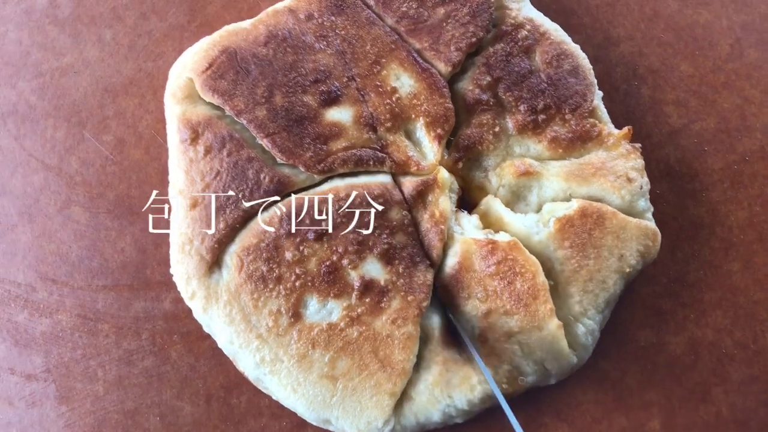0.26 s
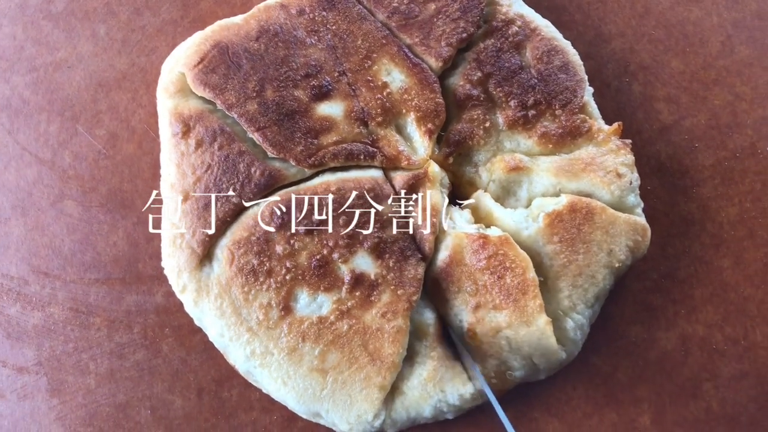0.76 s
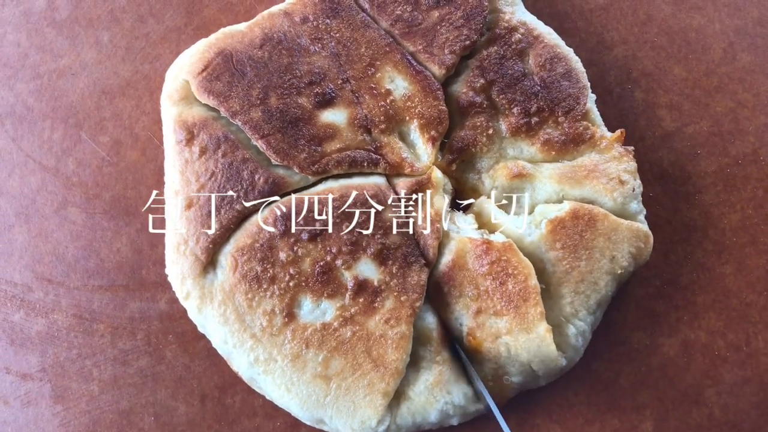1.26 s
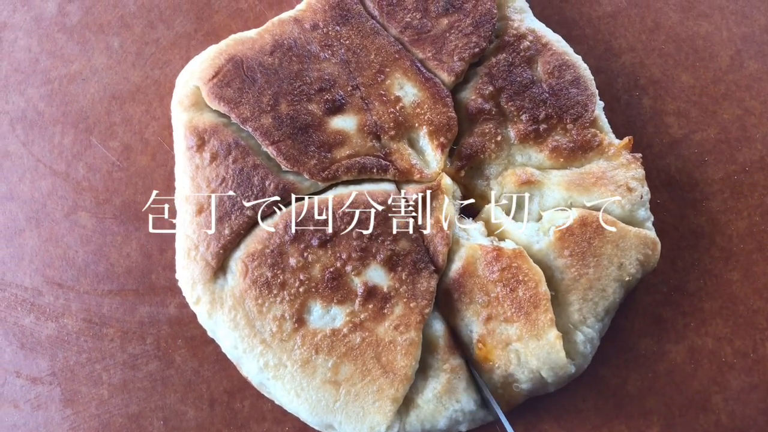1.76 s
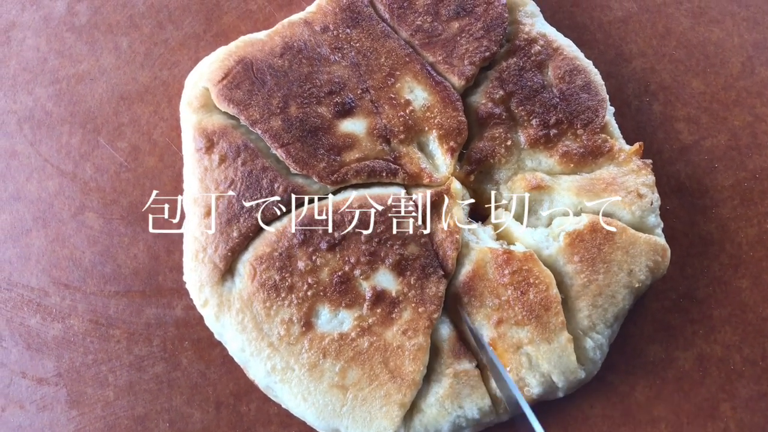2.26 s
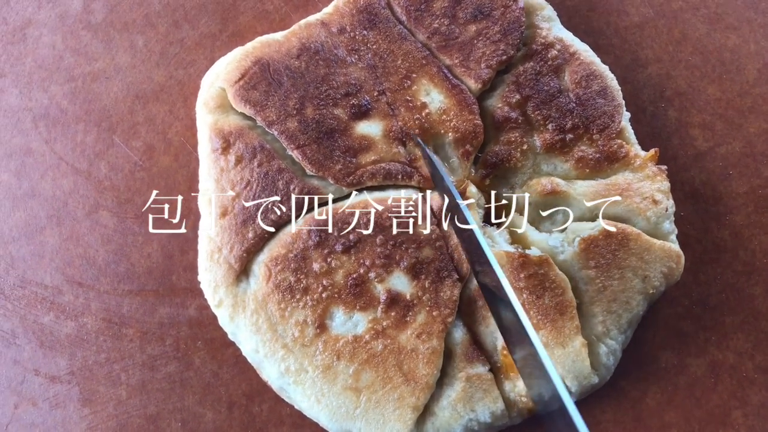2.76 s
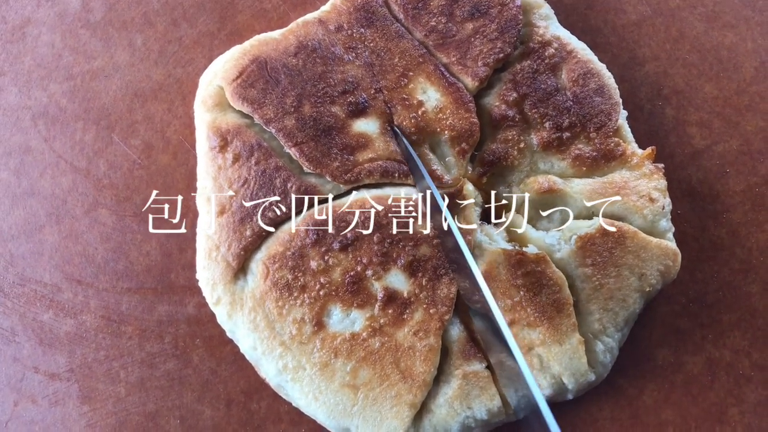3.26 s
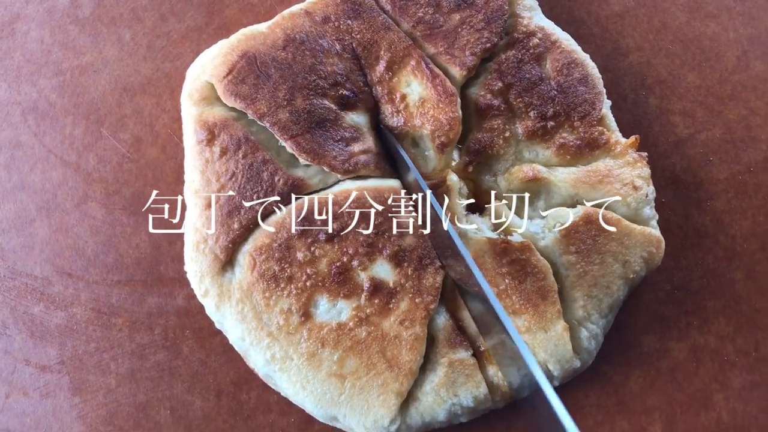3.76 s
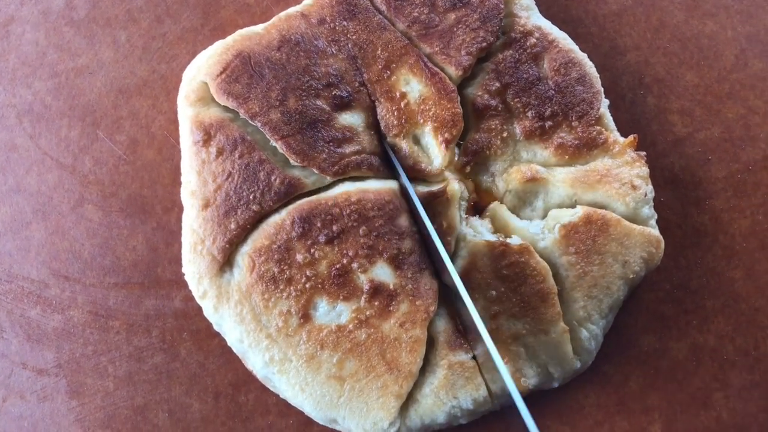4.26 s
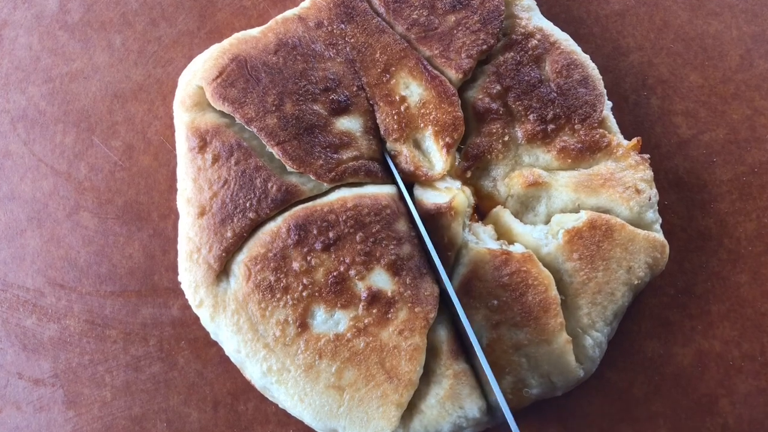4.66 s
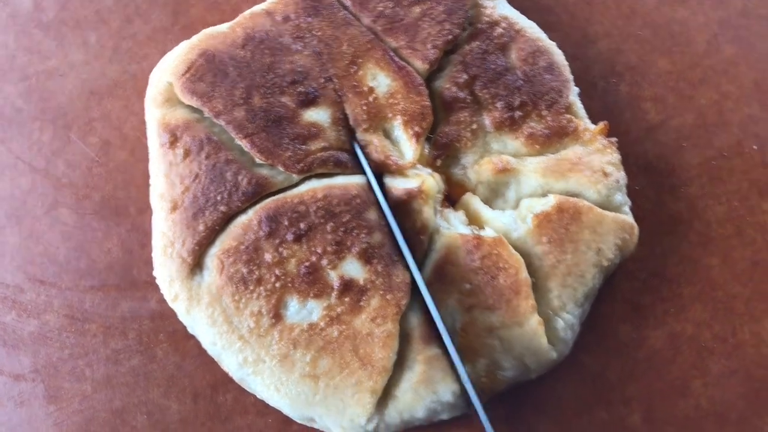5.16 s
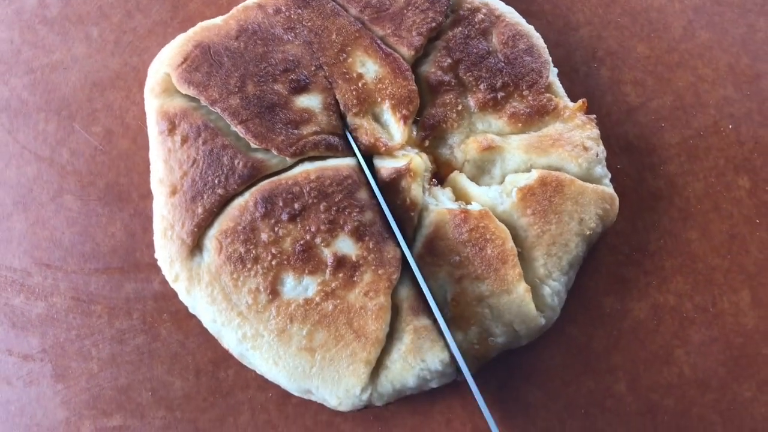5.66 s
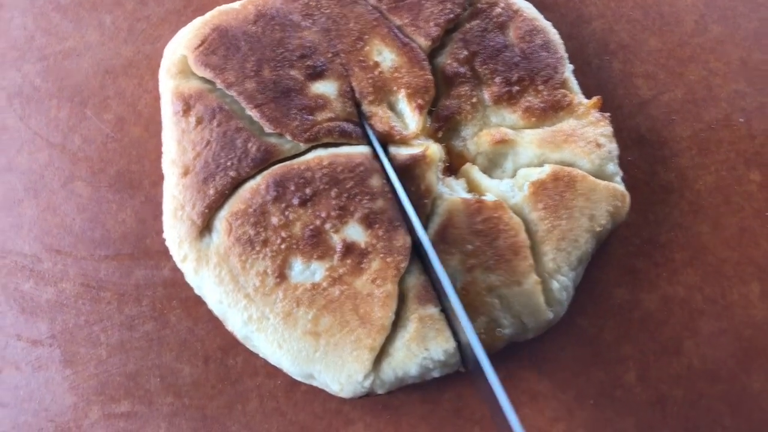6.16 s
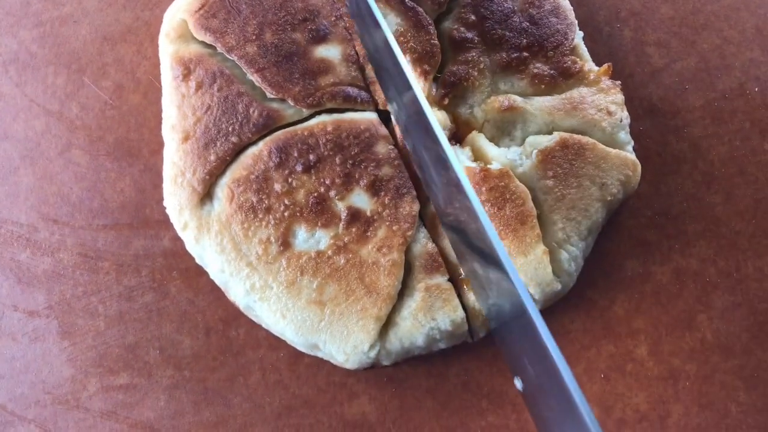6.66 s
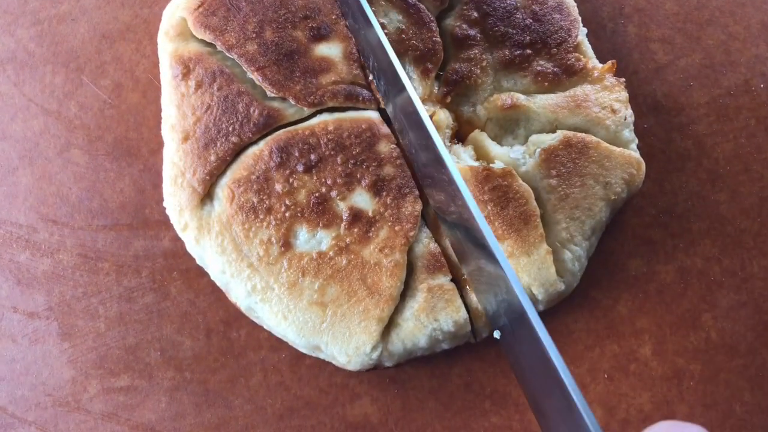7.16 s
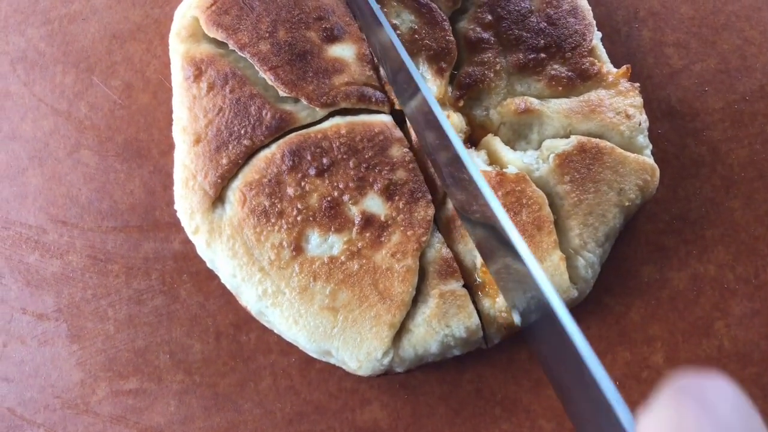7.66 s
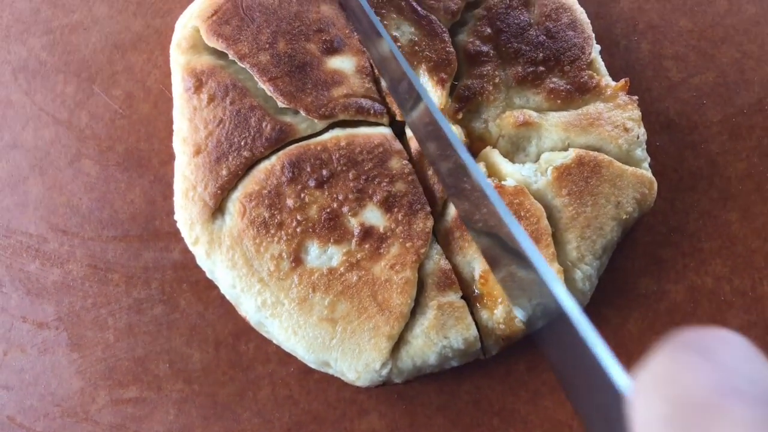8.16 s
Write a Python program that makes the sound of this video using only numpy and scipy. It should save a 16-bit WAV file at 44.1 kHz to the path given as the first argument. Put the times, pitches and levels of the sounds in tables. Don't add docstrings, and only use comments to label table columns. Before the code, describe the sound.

Quick dry rasps of a knife edge on crusty bread with tiny flake ticks, fading to faint shifts of the blade. Then brittle crunching in bursts, a cushioned thud, more crunching and a sharp woody knock as the edge hits the board. Crackles die away, and to-and-fro sawing returns. Mono, close phone microphone, small quiet kitchen with faint low room hum.

```python
import sys
import numpy as np
from scipy import signal
from scipy.fft import rfft, irfft, next_fast_len
from scipy.io import wavfile
from scipy.ndimage import uniform_filter1d

SR = 44100
rng = np.random.default_rng(int(sys.argv[2]) if len(sys.argv) > 2 else 0)


def boost_factor(decibels):
    exponent = np.asarray(decibels, float) / 20
    return 10 ** exponent


def pcm_store(signal):
    levels = np.round(np.clip(np.atleast_2d(signal), -1, 1) * 32767)
    wavfile.write(sys.argv[1], SR, levels.astype(np.int16).T)


N = 371763


def evened(x):
    return x / np.sqrt(np.mean(x ** 2) + 1e-20)


def read(points, hz):
    f, value = np.transpose(points)
    return np.interp(np.log(hz + 1), np.log(f + 1), value)


def coloured(x, points):
    size = next_fast_len(len(x))
    gain = boost_factor(read(points, np.fft.rfftfreq(size, 1 / SR)))
    return evened(irfft(rfft(x, size) * gain, size)[:len(x)])


def add(mix, s, sound):
    sound = sound[max(-round(s * SR), 0):]
    part = mix[max(round(s * SR), 0):][:len(sound)]
    part += sound[:len(part)]


def resonate(x, hz, width):
    return signal.lfilter(*signal.iirpeak(min(hz, SR / 2.2), hz / max(width, 5), SR), x)


def drift(points):
    once = uniform_filter1d(rng.standard_normal(N), int(points))
    return evened(uniform_filter1d(once, int(points)))


# frequency in Hz, level in dB per Hz.
AIR_SPECTRUM = [(20, -23), (69, -5), (342, -7), (400, -12.5), (1000, -19.5), (2370, -32.5), (12800, -30),
                (15200, -30.5)]
# frequency in Hz, width in Hz, level in dB.
RUMBLE_BANDS = [(62.4, 18, -76.5), (250.3, 18, -73)]
AIR_DB = -69


def air():
    x = coloured(rng.standard_normal(N), [(9, -56)] + AIR_SPECTRUM)
    bass = signal.sosfilt(signal.butter(2, 600, fs=SR, output="sos"), x)
    lumps = (boost_factor(0.56 * drift(3000)) - 1) * bass
    hum = sum(boost_factor(db) * evened(resonate(rng.standard_normal(N), hz, w)) for hz, w, db in RUMBLE_BANDS)
    return boost_factor(AIR_DB + 0.5) * (x + lumps) + hum


def grit(per_s, spread_db):
    size = boost_factor(spread_db * np.minimum(rng.exponential(1, N), 4.2))
    return size * rng.standard_normal(N) * (rng.random(N) < per_s / SR)


# frequency in Hz, width in Hz, level in dB.
BLADE_MODES = [(2210, 120, -3), (3080, 90, -3), (3700, 100, -1), (6100, 130, -1), (7730, 150, -4),
               (12000, 220, 0), (13200, 200, -2), (14450, 130, -2)]
# frequency in Hz, level in dB per Hz.
CRUMB_SPECTRUM = [(300, -0.5), (600, -5), (1000, 0.5), (1700, -5.5), (2500, -5.5), (4000, -21.5)]


def rubbing(rub, crumb, ringing, per_s, spread_db, hollow, colour):
    def ring_blade(x):
        return sum(boost_factor(db) * resonate(x, hz, w) for hz, w, db in BLADE_MODES)

    breaks = evened(grit(per_s, spread_db) * boost_factor(1.05 * drift(150)))
    blade = ring_blade(ringing * breaks) / np.std(ring_blade(breaks))
    body = crumb * boost_factor(0.8 * drift(300)) * coloured(grit(per_s / 3, spread_db), CRUMB_SPECTRUM)
    cavity = 2 * resonate(body, 1760, 500)
    body = (1 - hollow) * body + hollow * cavity
    return rub * coloured(breaks, colour) + blade + body


# frequency in Hz, level in dB per Hz.
GRIT_SPECTRUM = [(880, -41.5), (1500, -2), (2300, -6.5), (3200, -2), (5000, -2.5), (11300, -7),
                 (14900, -6.5), (16000, -12)]
# time in seconds, level in dB.
SETTLING = [
    (0, -75),
    (2.3, -78),
    (6.05, -74.5),
    (6.4, -79),
    (7.199, -76.5),
    (8.43, -77),
]
# start in seconds, length in seconds, rub level in dB, crumb against the rub in dB.
RIM_STROKES = [(-0.03, 0.13, -55.5, -3), (0.128, 0.12, -61, -9.5), (0.294, 0.091, -58.5, -4),
               (0.409, 0.14, -63.5, -8), (0.584, 0.093, -59, 0), (0.711, 0.13, -65.5, -2),
               (0.881, 0.12, -64, 1.1), (1.028, 0.1, -69, 2.5), (1.203, 0.076, -66.5, -0.5),
               (1.341, 0.057, -69.5, 3), (1.486, 0.058, -70.2, 2), (1.604, 0.086, -74.5, 0.5),
               (1.765, 0.04, -70.5, 5.5), (1.881, 0.022, -75, 8.5), (1.994, 0.063, -73, -6),
               (2.122, 0.013, -67.5, -4), (2.192, 0.025, -70.5, -4)]
SHIFTS = [(2.713, 0.048, -65.5, 1), (2.783, 0.054, -68, -2), (2.865, 0.028, -78, 0),
          (2.955, 0.0088, -71.5, -12), (3.11, 0.0033, -68, 4), (3.209, 0.053, -77.5, 7),
          (3.351, 0.054, -77, 7.5), (3.41, 0.16, -78, -4), (6.092, 0.016, -76.5, 2.5),
          (6.241, 0.064, -76, 7.5), (6.617, 0.025, -83, 6), (6.832, 0.015, -74, 3), (7.075, 0.011, -71, -2),
          (7.18, 0.036, -72.5, -1)]
CUT_STROKES = [
    (7.286, 0.11, -71.5, -1),
    (7.348, 0.12, -66.5, -1),
    (7.513, 0.1, -60, -6.5),
    (7.668, 0.072, -62, -1),
    (7.774, 0.11, -63, -2),
    (7.92, 0.073, -63, 3),
    (8.035, 0.092, -66, 1),
    (8.159, 0.085, -62.5, 4),
    (8.279, 0.1, -66, 2),
    (8.424, 0.03, -68.5, 7.5),
]
# ringing in dB at a -65.5 dB rub, share of the rub level
# it follows, fade within a stroke in dB.
RIM_RING = (-96, .1, -0.49)
SHIFT_RING = (-67, 2, -4.5)
CUT_RING = (-73.5, 0.47, -1.3)


def sawing():
    rub, crumb, ringing = np.zeros((3, N))
    passes = ((RIM_STROKES, RIM_RING), (SHIFTS, SHIFT_RING), (CUT_STROKES, CUT_RING))
    for strokes, (ring_db, follows, fade_db) in passes:
        for s, length, rub_db, crumb_db in strokes:
            u = np.linspace(0, 1, round((length + 0.02) * SR))
            fade = boost_factor(fade_db * np.interp(u, [0.3, 0.7], [-0.5, 0.5]))
            speed = fade * np.clip(np.sin(np.pi * u) * 1.47, 0, 1) ** 1.47
            add(rub, s - 0.012, speed * boost_factor(rub_db))
            add(crumb, s - 0.012, speed * boost_factor(rub_db + crumb_db))
            add(ringing, s - 0.012, speed * boost_factor(ring_db + follows * (rub_db + 65.5)))
    settling = boost_factor(np.interp(np.arange(N) / SR, *np.transpose(SETTLING)))
    return rubbing(np.hypot(rub, settling), crumb, ringing, 14000, 1.9, 0, GRIT_SPECTRUM)


def bending(spread, length):
    t = np.sqrt(spread / 5000) + np.arange(round(length * SR)) / SR
    return np.sin(2 * np.pi * spread / t) * signal.windows.tukey(len(t), 0.6)


# frequency in Hz, width in Hz, level in dB.
LOAF_MODES = [(1500, 730, 9.5), (2477, 2160, -4), (3500, 1300, -4.5)]


def snap(peak_db, hz, hollow_db, spray_db, noise):
    t = np.arange(len(noise)) / SR

    def colour(x):
        return resonate(x, hz, 0.262 * hz) + 0.27 * resonate(x, 11000, 9800)

    kick = signal.unit_impulse(len(t), 18) + 0.5 * noise * boost_factor(-60 * abs(t - 18 / SR) / 0.003)
    click = colour(kick)
    shower = noise[::-1] * boost_factor(spray_db + 0.5 - 60 * t / 0.022) * (1 - np.exp(-t / 0.00129))
    spray = colour(shower)
    spray = spray * np.linalg.norm(shower) / np.linalg.norm(spray)
    push = kick + 0.29 * noise * boost_factor(-60 * t / 0.029) * (1 - np.exp(-t / 0.001))
    hollow = sum(boost_factor(db) * resonate(push, f, w) for f, w, db in LOAF_MODES)
    sweep = np.pad(bending(0.00597, 0.00368), (0, len(t)))[:len(t)]
    hollow = hollow / abs(hollow).max() + 0.27 * sweep
    hollow = boost_factor(hollow_db) * hollow / abs(hollow).max()
    return boost_factor(peak_db) * (click / abs(click).max() + spray + hollow)


# time in seconds, peak in dB, centre in Hz.
FLAKES = [(0.0775, -38, 3800), (0.284, -42.5, 5770), (0.8674, -49, 14810), (0.9161, -51, 13090),
          (0.989, -42, 14470), (1.2516, -41, 14300), (1.4181, -45, 11100), (1.4453, -44, 6760),
          (1.4998, -48.5, 6890), (1.5223, -47, 7490), (1.5297, -48.5, 7320), (1.5796, -47.5, 12830),
          (1.7522, -47.5, 9050), (1.8024, -44, 7200), (1.8565, -44.5, 14300), (1.8654, -49, 6550),
          (2.004, -44, 5840), (2.1072, -40.5, 5640), (2.1211, -38.5, 3920), (2.126, -43, 14990),
          (2.7774, -50, 7700), (3.1062, -47, 13180), (3.4207, -51, 14500), (7.0736, -47.5, 7920),
          (7.1745, -52.5, 9000), (6.835, -58.5, 6000)]
# time in seconds, peak in dB, centre in Hz, hollow of the loaf against the peak in dB.
BITE_SNAPS = [(3.6538, -33.5, 11900, -14), (3.7137, -35, 2700, -11), (3.719, -28.5, 3060, -13.5),
              (3.7318, -29.5, 2740, -21), (3.7426, -35, 2700, -10), (3.766, -41, 2700, -12),
              (3.7938, -45, 3450, -7), (3.7991, -33, 2590, -14), (3.8215, -36, 7320, -24),
              (3.835, -33, 5800, -23), (3.856, -38, 2620, -5), (3.8593, -36.5, 14130, -15),
              (3.871, -43, 2620, 4), (3.9139, -24, 11600, -12), (3.9259, -43, 8790, -14),
              (3.9547, -52, 5600, -13), (3.6818, -50, 5250, -12), (4.016, -53.5, 5540, 1),
              (3.7257, -35.5, 3000, -2.5), (3.762, -44, 2700, 1.5), (4.2526, -43.5, 5770, -16),
              (4.291, -51, 3530, -3), (4.2962, -44, 7750, -2), (4.3135, -54.5, 2700, 10),
              (4.335, -40, 6900, -2.5), (4.3562, -33, 7400, -6), (4.3865, -38, 2730, -33)]
SINK_SNAPS = [(4.5097, -42.5, 4840, -29), (4.5265, -49, 5000, -20), (4.539, -44.5, 12750, -13),
              (4.5637, -47, 3220, -25), (4.5676, -40.5, 3340, -18), (4.6053, -45.5, 5100, -5),
              (4.6432, -58.5, 3010, 10), (4.697, -39.5, 14810, -10.5), (4.732, -42, 2680, 3),
              (4.76, -42.5, 5170, -1.5), (4.777, -49, 7920, -18), (4.808, -44.5, 12580, -20),
              (4.8601, -42, 7700, -4), (4.8934, -50, 7060, -24), (4.9173, -41.5, 6800, -8),
              (4.9612, -43, 13870, -12), (4.9708, -38, 2900, 6), (4.7161, -50, 6630, -23),
              (4.654, -48, 5000, -7)]
ROCK_SNAPS = [(5.1135, -40, 4000, -24), (5.1198, -32.5, 3840, -10), (5.1466, -38, 4500, -3),
              (5.1617, -31.5, 2670, -13), (5.1754, -29, 4800, -4.5), (5.1802, -34.5, 4870, -15),
              (5.2182, -30.5, 8080, -5.5), (5.2357, -37, 4040, -8.5), (5.2121, -41.5, 5250, -17.5),
              (5.2456, -38.5, 8900, -10), (5.2635, -37, 8000, -9), (5.2864, -47.5, 7900, -24),
              (5.3297, -22, 4200, -15), (5.338, -36, 5200, -8), (5.388, -34, 2700, -16),
              (5.4103, -38, 3600, 0.5), (5.4781, -27, 2740, 12), (5.532, -29, 4260, -5),
              (5.6027, -36.5, 5300, -12), (5.615, -37.5, 4570, -16), (5.6327, -42.5, 2700, -2),
              (5.7076, -40.5, 3840, -16), (5.7176, -40.5, 6930, -7.5), (5.8636, -44, 4000, -8),
              (5.9086, -44, 4850, -8), (5.917, -40.5, 8100, -13), (5.9396, -31, 4760, -7.5),
              (5.9449, -42, 14900, 2.5), (5.9529, -35, 3850, -4)]
FLAKE_HOLLOW_DB, FLAKE_SPRAY_DB, SNAP_SPRAY_DB = -22, -24, -19


def cracking():
    rows = [(s, db, hz, FLAKE_HOLLOW_DB, FLAKE_SPRAY_DB) for s, db, hz in FLAKES]
    rows += [(*row, SNAP_SPRAY_DB) for row in BITE_SNAPS + SINK_SNAPS + ROCK_SNAPS]
    out = np.zeros(N)
    for (s, *row), noise in zip(rows, rng.standard_normal((len(rows), 2000))):
        add(out, s - 14 / SR, snap(*row, noise))
    return out


def thud(peak_db, hz, t60):
    t = np.arange(SR // 3) / SR
    bent = t + 0.00048 * (1 - np.exp(-t / 0.0031))
    return boost_factor(peak_db - 60 * t / t60) * np.sin(2 * np.pi * hz * bent) * (1 - np.exp(-4.0 * hz * t))


# time in seconds, peak in dB, frequency in Hz, decay t60 in seconds.
DULL_BLOWS = [(1.218, -46, 865, 0.012), (1.2365, -41, 790, 0.014), (1.241, -50, 455, 0.022),
              (1.252, -39, 800, 0.0082), (1.263, -48, 171, 0.045), (1.241, -50, 1500, 0.013),
              (1.24, -51.5, 287, 0.075), (3.735, -48.5, 143, 0.067), (3.869, -45, 121, 0.031),
              (4.53, -52.5, 50, 0.23), (4.9771, -28, 186, 0.046), (4.977, -32, 274, 0.11),
              (4.9755, -37, 650, 0.024), (4.982, -32.5, 135, 0.063), (4.98, -34.5, 71.5, 0.13),
              (5.4815, -13, 493, 0.011), (5.483, -27.5, 268.4, 0.15), (5.485, -23.5, 134, 0.033),
              (5.485, -44, 65.2, 0.17), (5.952, -49.5, 151.2, 0.078), (7.073, -52, 792, 0.02)]


def thuds():
    out = np.zeros(N)
    for s, *row in DULL_BLOWS:
        add(out, s, thud(*row))
    return out


# start in seconds, length in seconds, crackle in dB
# at the start, crackle in dB at the end, crumb against the crackle in dB.
YIELDS = [(3.621, 0.16, -71, -66, 3), (3.706, 0.26, -50, -69.5, -1), (3.93, .13, -66, -71.5, -0.5),
          (4.148, 0.053, -71, -74, 3), (4.272, 0.035, -74, -71, 9), (4.337, 0.07, -61, -65, -18),
          (4.487, 0.18, -66, -66, -7), (4.681, 0.31, -64.5, -58.5, 0.5), (3.793, 0.0077, -42, -50.5, 7.5),
          (4.05, 0.038, -79, -62, -0.5), (5.0, 0.14, -75, -71.5, 9.5), (5.107, 0.32, -52.5, -71.5, 5),
          (5.33, 0.11, -50.5, -70.5, -1), (5.397, 0.069, -51, -47, 3.5), (5.484, 0.08, -52, -42.5, 2),
          (5.574, 0.12, -46.5, -67, 1.5), (5.702, 0.07, -53.5, -66, -1.5), (5.852, 0.069, -54.5, -68, 0),
          (5.911, 0.037, -71, -55, 2), (5.962, 0.066, -54, -78, 4)]
# frequency in Hz, level in dB per Hz.
CRACKLE_SPECTRUM = [(880, -31.5), (1600, -5), (4500, 0), (6000, -3), (14900, -9.5), (16000, -15)]
PUSH_RISE_S, PUSH_FALL_S = 0.005, 0.018


def crunch():
    rub, crumb = np.zeros((2, N))
    for s, length, start_db, end_db, crumb_db in YIELDS:
        t = np.arange(0, length + PUSH_FALL_S, 1 / SR)
        edges = np.clip(np.minimum(t / PUSH_RISE_S, (t[-1] - t) / PUSH_FALL_S), 0, 1)
        load = edges * boost_factor(start_db - 5 + (end_db - start_db) * t / length)
        add(rub, s, load)
        add(crumb, s, load * boost_factor(crumb_db))
    return rubbing(rub, crumb, rub * boost_factor(-19), 8000, 3.05, 0.58, CRACKLE_SPECTRUM)


# start in seconds, length in seconds, level in dB.
SUNG_NOTES = [
    (4.9, .075, -70),
    (5.01, .095, -74),
]
SONG_HZ = 2196


def song():
    level = np.zeros(N)
    for s, length, level_db in SUNG_NOTES:
        add(level, s, boost_factor(level_db) * signal.windows.tukey(round(length * SR), 0.4))
    return np.sqrt(2) * level * np.sin(2 * np.pi * np.cumsum(SONG_HZ + drift(1500)) / SR)


# frequency in Hz, level in dB, decay t60 in seconds.
BOARD_MODES = [(632, -17.5, 0.038), (1063, 4, 0.078), (1322, -10.5, 0.016), (1648, -23, 0.037),
               (2250, 0, 0.026), (3152, -10.5, .05)]
# frequency in Hz, level in dB per Hz.
RATTLE_SPECTRUM = [(60, -26.5), (150, 2.5), (600, 1), (1300, 5.5), (3000, -7.5), (6000, -36.5)]


def knock(peak_db, sharp_hz, rattle_db, top_hz, noise):
    t = np.arange(len(noise)) / SR
    sweep = bending(0.0091, 0.0019)
    sweep = np.pad(sweep, (0, len(t) - len(sweep)))
    slap = resonate(sweep, sharp_hz, 150)
    modes = sum(boost_factor(db) * t60 * resonate(sweep, hz, 4.1 / t60) for hz, db, t60 in BOARD_MODES)
    ring = 0.75 * sweep + slap / abs(slap).max() + 0.43 * modes / abs(modes).max()
    late = np.maximum(t - 0.003, 0)
    decay = boost_factor(rattle_db - 60 * late / 0.11) * (1 - np.exp(-late / 0.00043))
    rattle = coloured(noise, RATTLE_SPECTRUM) * decay
    cushion = signal.butter(3, top_hz, fs=SR, output="sos")
    return boost_factor(peak_db) * signal.sosfilt(cushion, ring / abs(ring).max() + rattle)


# time in seconds, peak in dB, sharpness in Hz, rattle against the peak
# in dB, top of the blow in Hz.
BOARD_BLOWS = [
    (4.9715, -34.5, 1380, -9.5, 1760),
    (5.4786, -11.5, 1500, -14, 9000),
]


def knocks():
    out = np.zeros(N)
    for (s, *row), noise in zip(BOARD_BLOWS, rng.standard_normal((len(BOARD_BLOWS), 14000))):
        add(out, s, knock(*row, noise))
    return out


# frequency in Hz, decay t60 in seconds.
KITCHEN_DECAY = [(100, 0.52), (1000, 0.19), (4000, 0.077), (12000, 0.098)]


def kitchen(x):
    taps = np.zeros(SR // 2)
    at = np.arange(120, SR // 2 - 20, 20)
    taps[at + rng.integers(0, 20, len(at))] = rng.choice([-1., 1.], len(at))
    hz, t, z = signal.stft(taps, SR, nperseg=256)
    decay = boost_factor(-60 * t / read(KITCHEN_DECAY, hz)[:, None])
    tail = signal.istft(z * decay, SR, nperseg=256)[1]
    return signal.fftconvolve(x, tail / np.linalg.norm(tail))[:N]


EDGE_HZ, TOP_HZ = 15950, 16800


def scene():
    hits = cracking() + thuds() + knocks()
    drag = sawing() + crunch() + song()
    steady = (1 - boost_factor(-24.5)) * hits + drag + boost_factor(-13.0) * kitchen(hits + drag) + air()
    steady = signal.oaconvolve(steady, signal.firwin(301, EDGE_HZ, fs=SR), "same")
    trace = signal.oaconvolve(hits, signal.firwin(301, TOP_HZ, fs=SR), "same")
    return (boost_factor(-12.5) * trace + steady)[None]


def low_pass(x):
    return signal.sosfilt(signal.butter(12, 16990, fs=SR, output="sos"), x)


def record(dry):
    return low_pass(dry)


dry = scene()
out = record(dry)
pcm_store(out)
```